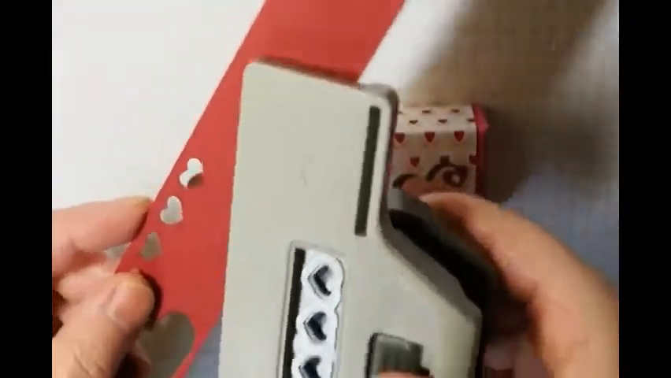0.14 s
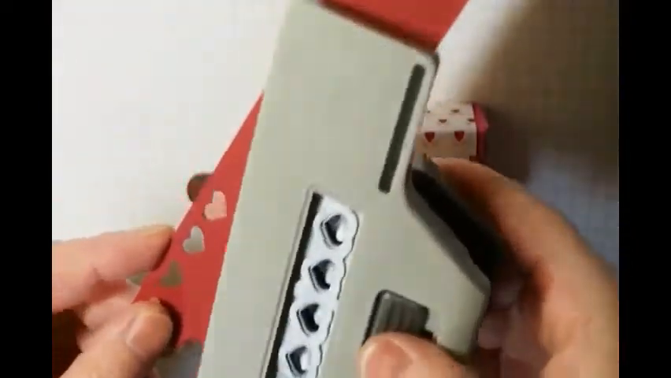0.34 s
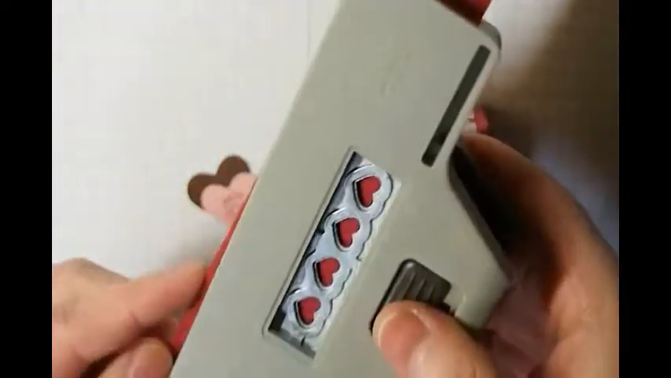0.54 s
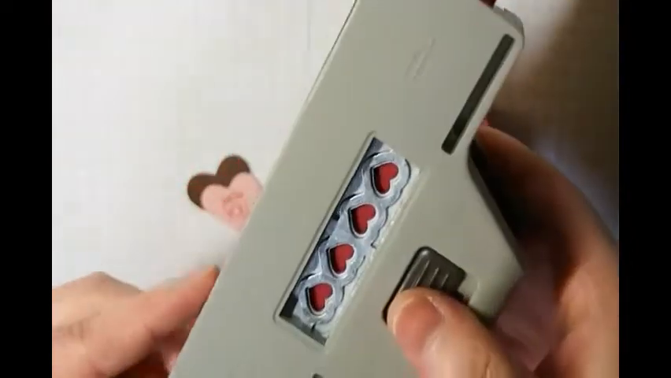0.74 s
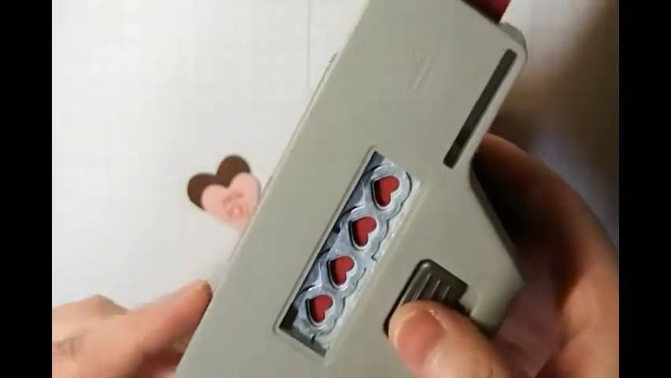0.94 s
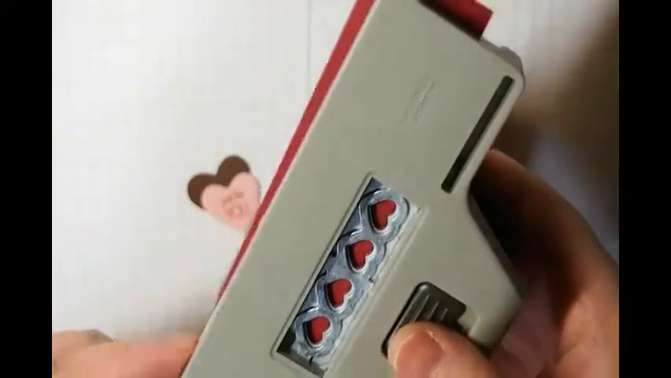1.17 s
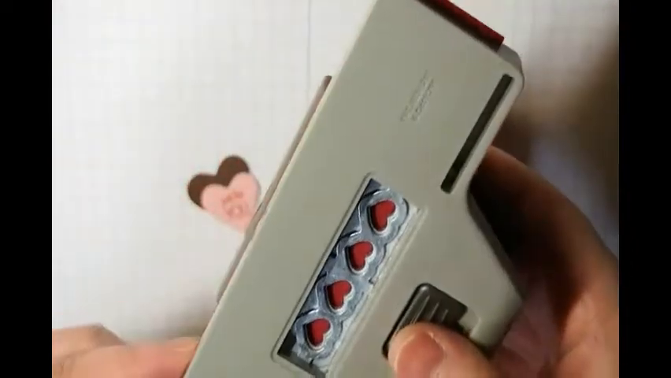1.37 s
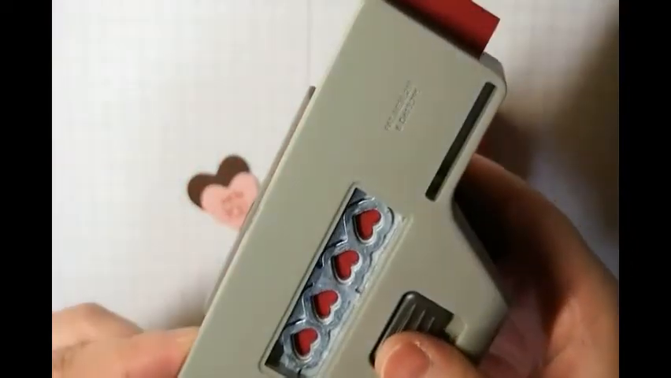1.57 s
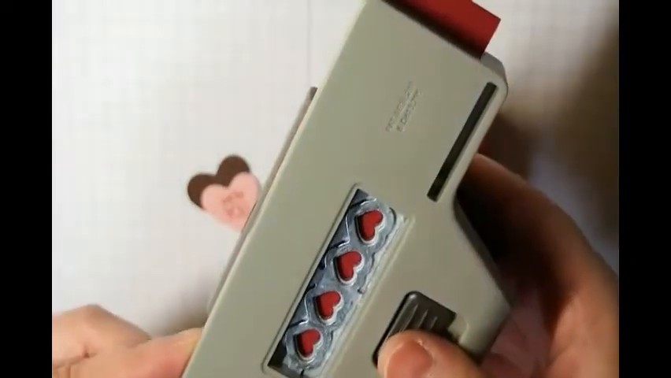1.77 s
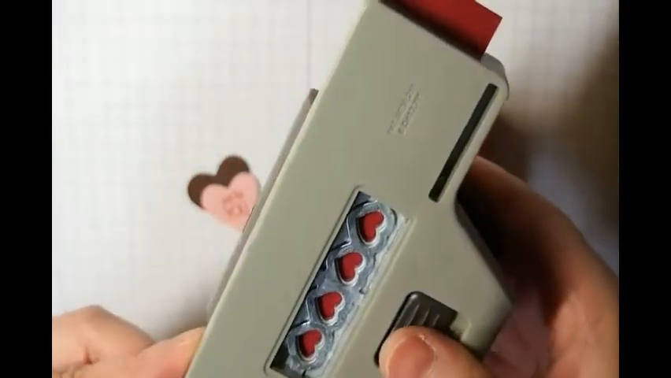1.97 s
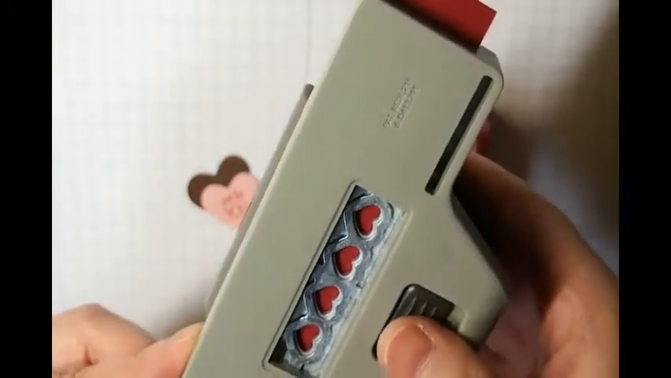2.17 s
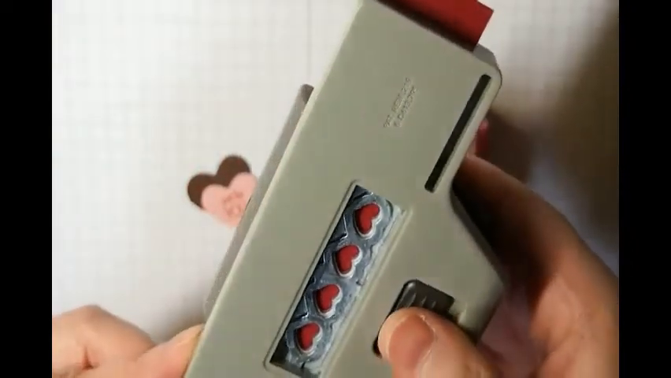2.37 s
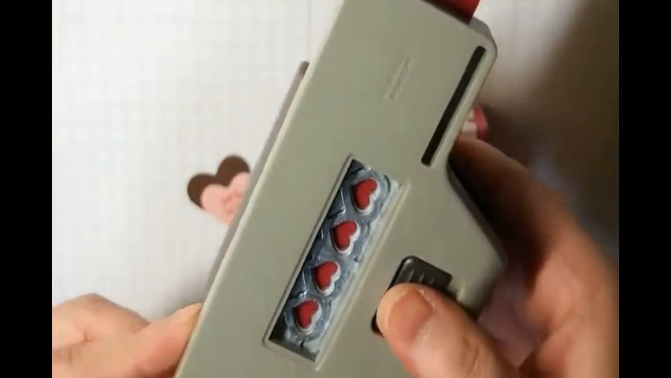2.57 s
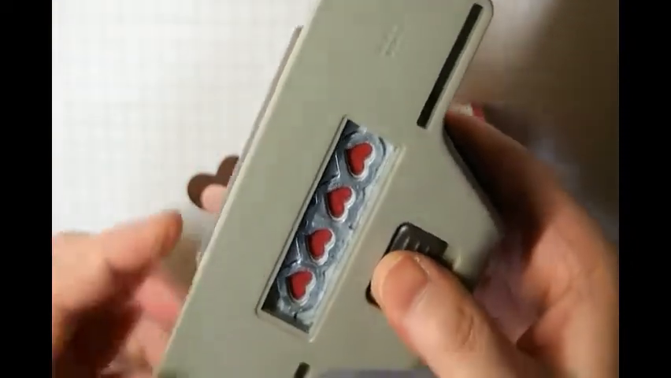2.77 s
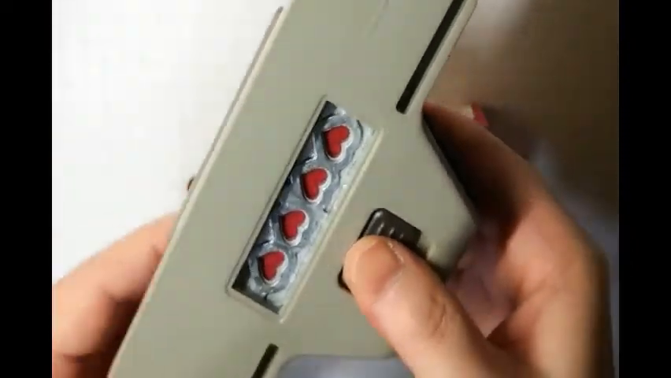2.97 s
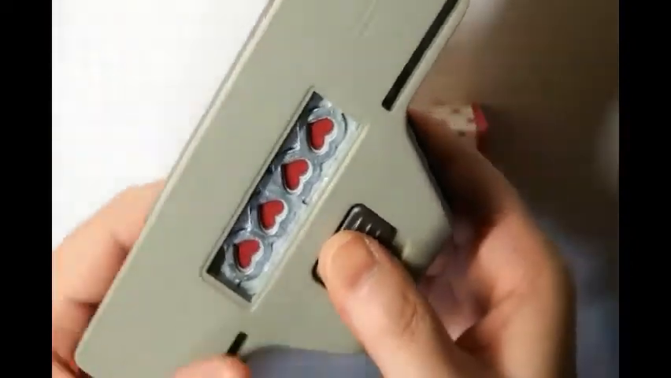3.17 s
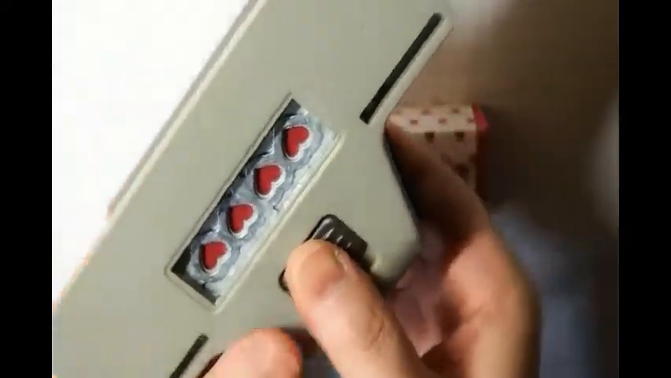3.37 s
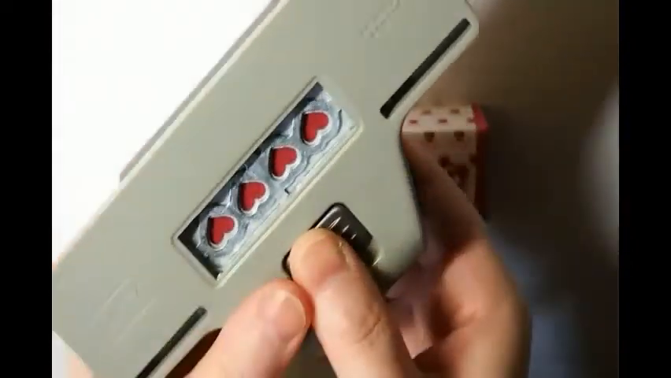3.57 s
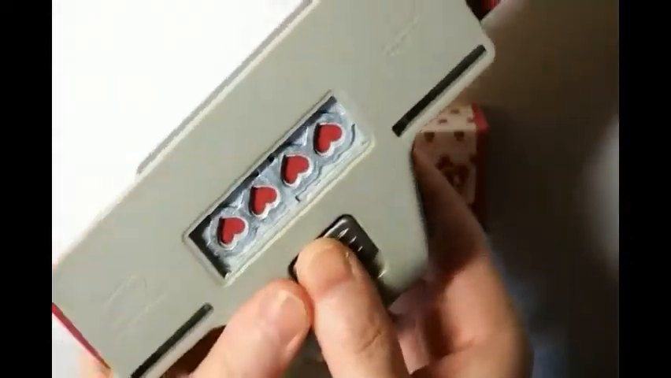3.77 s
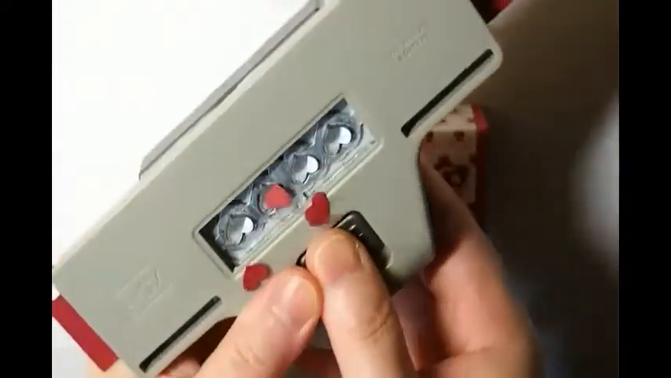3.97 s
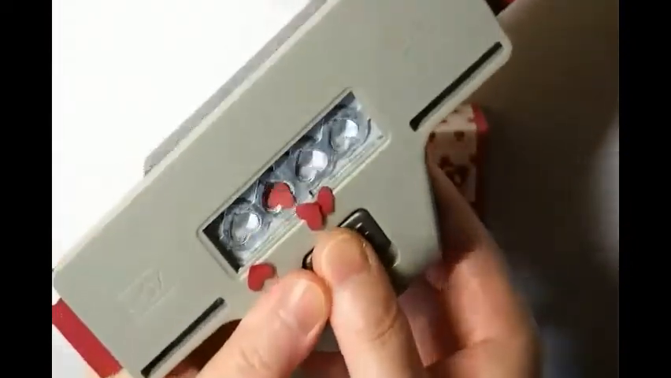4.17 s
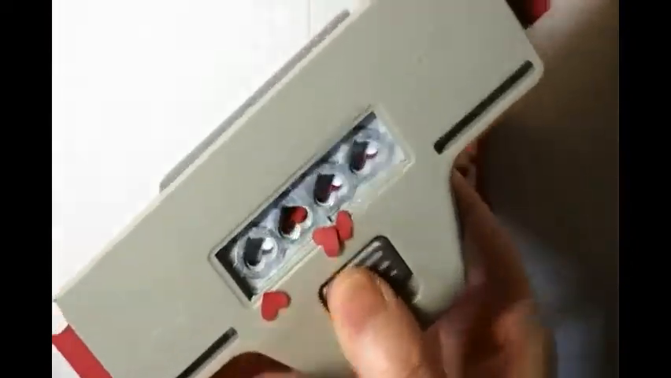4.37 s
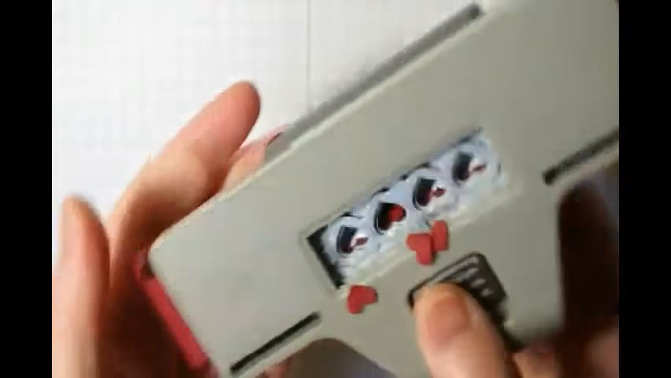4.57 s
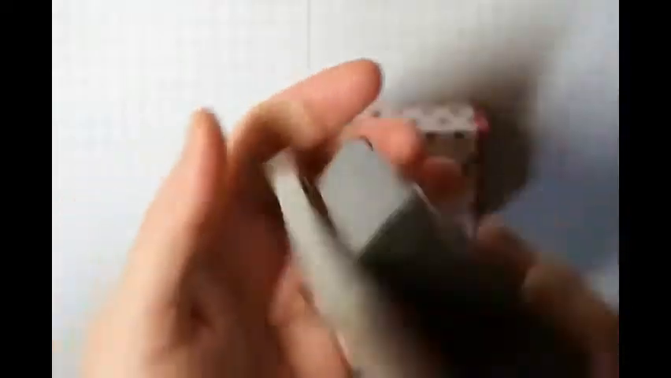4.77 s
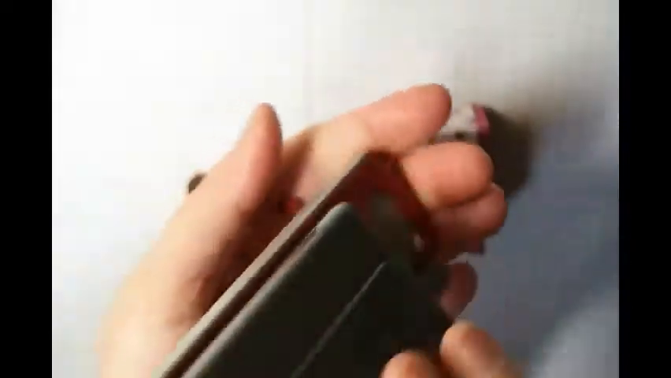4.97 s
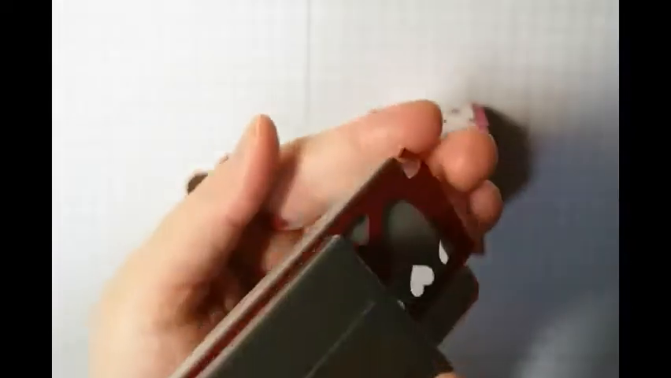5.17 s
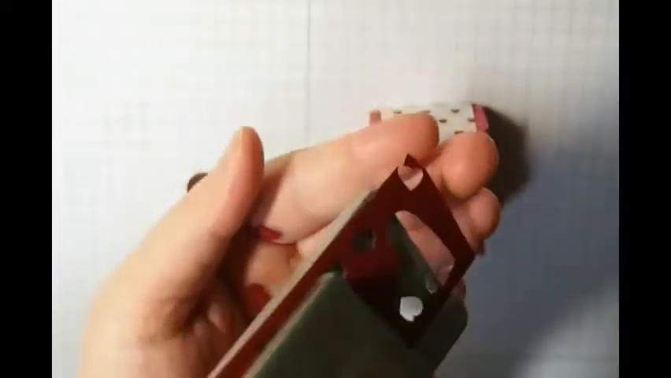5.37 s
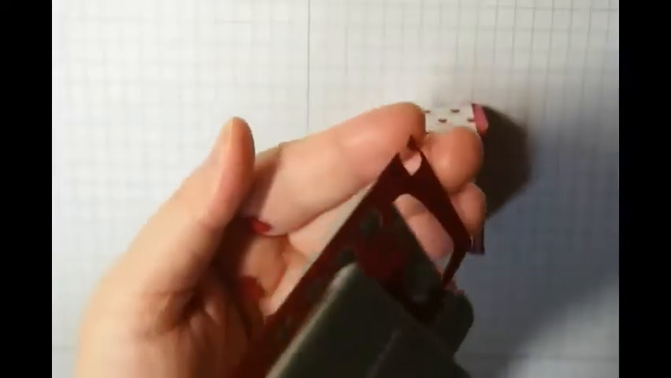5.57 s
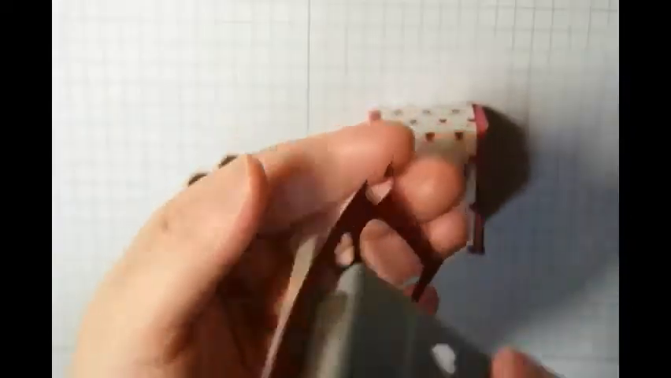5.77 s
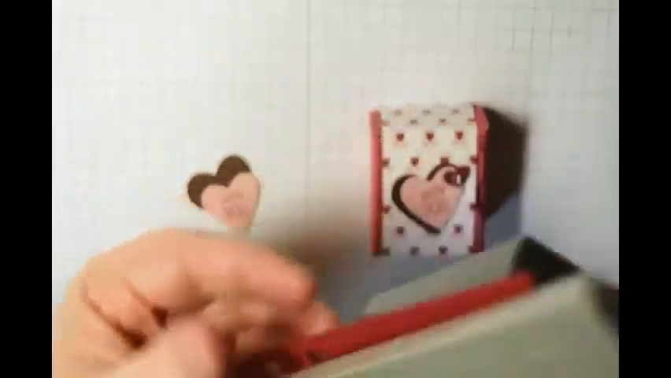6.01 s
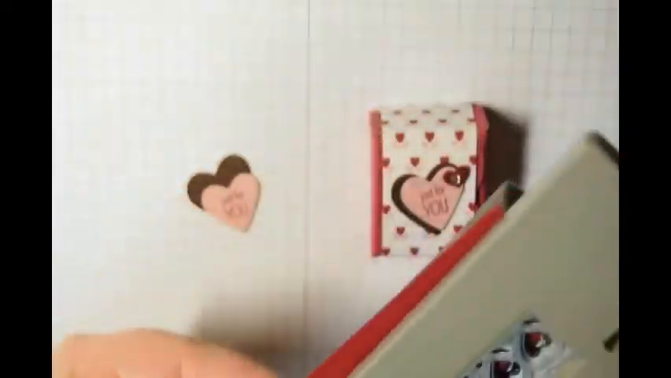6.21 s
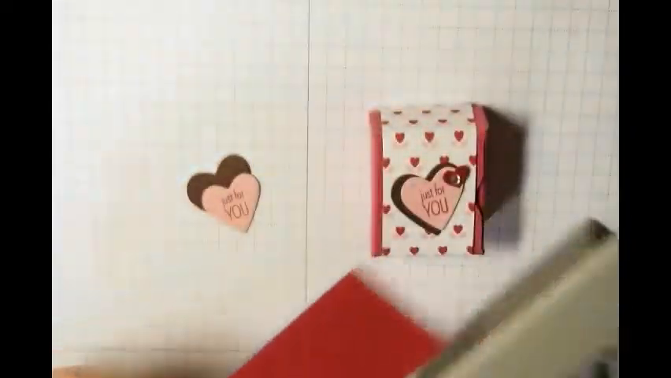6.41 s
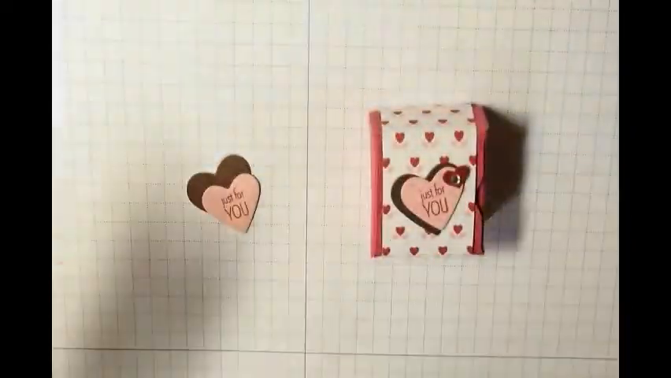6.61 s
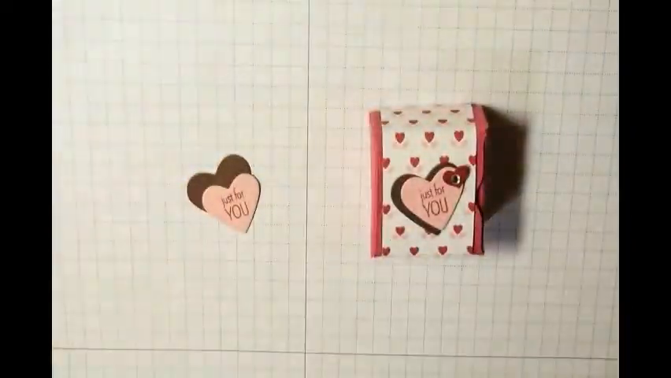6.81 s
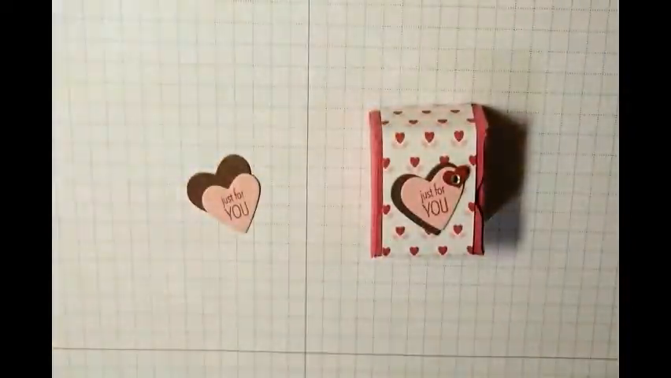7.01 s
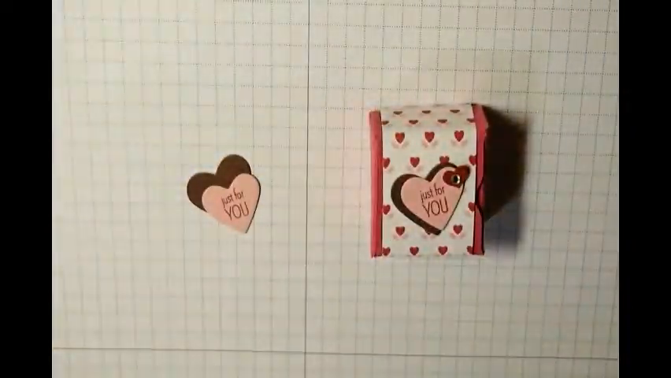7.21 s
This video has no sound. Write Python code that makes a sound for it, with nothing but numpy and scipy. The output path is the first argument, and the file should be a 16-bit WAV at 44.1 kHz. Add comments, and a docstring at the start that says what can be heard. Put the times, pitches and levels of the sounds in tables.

```python
"""A hand-held plastic punch bites twice into a strip of cardstock, the second time doubly, and snaps through.
Each contact is a swelling noise burst: a bright crack that excites the housing modes, plus a tuned knock.
Card, fingers and the returning lever tap the housing; slides, squeeze and release are stick-slip noise.
Beneath lie a faint, partly shared room hiss and a faint fluttering drone of ticks from a small motor.
Reflections of a small room surround all but hiss and thud; a limiter ducks the sound above its ceiling."""
import sys
import numpy as np
from scipy import signal
from scipy.fft import rfft, irfft, next_fast_len
from scipy.io import wavfile
from scipy.ndimage import uniform_filter1d

SR = 44100
rng = np.random.default_rng(int(sys.argv[2]) if len(sys.argv) > 2 else 0)


def log_audio(samples):
    """Write samples as a 16-bit WAV file to the path given in sys.argv[1]."""
    # one column per channel
    frames = np.atleast_2d(samples).T
    # limit to full scale, then quantise
    limited = np.clip(frames, -1, 1)
    pcm = np.round(limited * 32767).astype(np.int16)
    wavfile.write(sys.argv[1], SR, pcm)


N = 319725

# resonances of the hollow plastic body: pitch_hz, width_hz, relative level_db
HOUSING_MODES = [(756, 180, -10), (1140, 270, -29), (1662, 230, 2), (1557, 210, 1), (1750, 36, -15),
                 (2230, 680, -1), (2686, 165, -4), (3160, 153, 8.5), (4270, 59, 2.5), (5430, 91, -3),
                 (5900, 470, -1), (6250, 170, -7.5)]


def from_db(db):
    """Decibels express a logarithmic amplitude ratio; this returns the ratio."""
    return 10 ** (np.asarray(db) / 20)


def rms_one(x):
    """Root-mean-square normalisation: mean power becomes one."""
    return x / np.sqrt(np.mean(x ** 2) + 1e-20)


def at_hz(points, hz):
    """Linear interpolation of a table on a logarithmic frequency axis."""
    table_hz, value = np.transpose(points)
    return np.interp(np.log(np.maximum(hz, 1)), np.log(table_hz), value)


def coloured(x, spectrum):
    """Spectral shaping: each frequency is multiplied by its tabled gain, then the rms is set to one."""
    size = next_fast_len(x.shape[-1])
    gain = from_db(at_hz(spectrum, np.fft.rfftfreq(size, 1 / SR)))
    shaped = irfft(rfft(x, size) * gain, size)
    return rms_one(shaped[..., :x.shape[-1]])


def drift(rate_hz):
    """Slow random fluctuation: random values arrive at a given rate and are joined by straight lines."""
    turns = np.arange(N) / SR * rate_hz
    return np.interp(turns, np.arange(N), rng.standard_normal(N))


def resonance(x, hz, width_hz):
    """A damped oscillator as a two-pole filter, with gain near one at its peak."""
    r = np.exp(-np.pi * width_hz / SR)
    zeros = np.array([1, 0, -1]) * (1 - r * r) / 2
    poles = [1, -2 * r * np.cos(2 * np.pi * hz / SR), r * r]
    return signal.lfilter(zeros, poles, x + 1e-18)


def panned(x, left_db):
    """Interaural level difference: left exceeds right by left_db."""
    return x * from_db(np.array([[left_db], [-left_db]]) / 2)


def air():
    """Broadband ambient noise with steady resonances, partly correlated between the sides."""
    # spectrum of the background: pitch_hz, relative level_db
    air_colour = [(25, 4.5), (45, -8.5), (90, -1.5), (180, 1.5), (280, -2), (400, -6.5), (520, -1.5),
                  (680, 1), (1000, -5), (1600, -0.5), (2300, -6), (4500, -7), (14000, -10.5), (16000, -16)]
    # steady rings in the hiss: pitch_hz, width_hz, level_db (rms before panning)
    hiss_rings = [(3033, 220, -66), (6330, 390, -72.5), (1700, 67, -82)]
    white = 0.61 * rng.standard_normal(N) + rng.standard_normal((2, N))
    rings = sum(from_db(db) * rms_one(resonance(white, hz, width)) for hz, width, db in hiss_rings)
    return from_db(-54) * coloured(white, air_colour) + rings


def drone(level_db, weak_db, low_hz, top_hz, uneven_db, ring_hz, ring_width_hz):
    """A band-limited pulse train from a small motor, strong and weak in turn; dispersion chirps each tick upward."""
    # stretches of drone and lone ticks where it stalls and restarts: start_s, end_s, relative level_db
    drone_runs = [(.0575, 2.64, 0), (2.688, 2.70, 0), (3.2695, 3.28, 3.5), (3.3267, 3.34, -3),
                  (3.3607, 7.25, 0)]
    ticks_per_s = 29.97
    ticks = np.zeros(N)
    for start_s, end_s, db in drone_runs:
        at = (np.arange(start_s, end_s, 1 / ticks_per_s) * SR).astype(int)
        alternate_db = weak_db * (np.arange(len(at)) % 2)
        ticks[at] = from_db(db + alternate_db + uneven_db * rng.standard_normal(len(at)))
    ticks = signal.sosfilt(signal.cheby1(10, .5, top_hz, fs=SR, output="sos"), ticks + 1e-18)
    ticks = signal.sosfilt(signal.butter(2, low_hz, "high", fs=SR, output="sos"), ticks)
    ticks = ticks - 2 * resonance(ticks, ring_hz, ring_width_hz)  # all-pass: delay without colour
    return from_db(level_db) * rms_one(np.diff(ticks, prepend=0))


def housing(x):
    """Modal superposition: the hollow body answers as a sum of resonances of alternating sign."""
    ringing = 0
    for k, (hz, width_hz, db) in enumerate(HOUSING_MODES):
        ringing = ringing + (-1) ** k * from_db(db) * resonance(x, hz, width_hz)
    return ringing


def burst(swell_s, size=9000, lead_count=200):
    """Impact as a cluster of micro-slips: noise swells and decays, with an impulse that dominates brief hits."""
    clean_snap_s = 0.00075  # here the impulse is as large as the norm of the noise
    age = np.maximum(np.arange(size) - lead_count, 0) / SR / swell_s
    slips = rng.standard_normal(size) * age * np.exp(-age)
    slips /= np.linalg.norm(slips)
    slips[np.argmax(age >= 1)] += (clean_snap_s / swell_s) ** 2
    return slips


def add(track, s, sound, db, lead_count=200):
    """Superposition at equal energy: the level is the sound's whole energy taken as rms over 5 ms."""
    start = int(s * SR) - lead_count  # the sound begins with a silent lead-in
    sound = sound * signal.windows.tukey(len(sound), .03)
    sound = sound * from_db(db) * np.sqrt(.005 * SR / np.sum(sound ** 2))
    track[start:start + len(sound)] += sound[:N - start]


def contacts(table, knock_q, ring_db):
    """Impact excitation: a bright crack sets the modes ringing, beside a knock at the struck spot's pitch."""
    # spectrum of a crack: pitch_hz, relative level_db
    crack_colour = [(100, -23), (400, -4.5), (800, -35), (1500, 8), (3500, 0.5), (6500, 5), (9000, 6),
                    (13000, 6), (16000, -9)]
    out = np.zeros(N)
    for s, swell_s, crack_db, knock_db, knock_hz in table:
        crack = coloured(burst(swell_s), crack_colour)
        narrow_knock = resonance(burst(swell_s), knock_hz, knock_hz / knock_q)
        knock = resonance(narrow_knock, knock_hz, knock_hz)
        add(out, s, crack + from_db(ring_db) * housing(crack), crack_db)
        add(out, s, knock, knock_db)
    return out


def taps():
    """Brief impacts: card and fingers tap the housing and the lever rattles springing back, all of one rise time."""
    # levels before room and panning: start_s, crack level_db, knock level_db, pitch_hz of the spot hit
    tap_rows = [(.0835, -55, -57, 5140), (.2572, -47.5, -41, 980), (0.259, -52, -43, 2900),
                (0.331, -44.5, -45.5, 876), (0.3919, -41, -46, 1080), (0.7842, -46, -33, 1780),
                (1.2080, -48.5, -58, 3150), (1.291, -54, -53, 1680), (3.396, -56, -49, 1570),
                (3.5824, -34.5, -48, 1670), (4.3580, -56, -41, 6050), (4.3669, -49, -35.5, 1430),
                (4.4130, -51, -45, 6200), (4.4230, -50, -38, 5860), (4.4457, -44, -41, 3900),
                (4.4670, -50, -47.5, 1610), (4.4730, -55, -45, 6200), (4.8530, -44, -50, 3300),
                (5.467, -53, -44.5, 2900), (5.943, -48, -60, 3180), (5.987, -34.5, -39, 12600),
                (5.9998, -34, -35.5, 2800), (6.0228, -38, -40, 4650), (6.0330, -43, -42, 3220),
                (6.0570, -45, -35, 1650), (6.4051, -38, -35, 6200), (6.4059, -52, -34.5, 4000),
                (6.5510, -44, -47, 875), (6.939, -62, -50.5, 3480)]
    swell_s = .0007
    return [(s, swell_s, crack_db, knock_db, hz) for s, crack_db, knock_db, hz in tap_rows]


def strokes():
    """Friction envelopes: each stroke sets in, changes steadily in decibels and decays when the motion stops.

    Returns hiss gain, rub gain and the power-weighted leading pitch in octaves."""
    # slides of card and hands, the card straining under the squeeze, and the lever's release:
    # start_s, end_s, growth_db over the stroke, final card hiss level_db and
    # final housing rub level_db (before mixing), pitch_hz that leads
    stroke_rows = [(0.333, 0.656, 5, -45, -49, 1910), (0.396, 0.574, -5.5, -62, -51, 5270),
                   (0.674, 0.727, -5, -54, -51.5, 3080), (0.768, .795, 6, -48, -42, 1760),
                   (0.884, 0.972, -6.5, -58, -56.5, 1700), (1.125, 1.156, 0.5, -59, -60.5, 1800),
                   (1.418, 1.426, 10, -50, -45, 3300), (1.63, 1.728, 5.5, -53, -51.5, 1700),
                   (2.819, 2.834, 10, -45.5, -47.5, 1600), (3.32, 3.477, 1, -53.5, -61, 1670),
                   (3.494, 3.558, 9, -50, -44, 3160), (3.581, 3.644, -11.5, -60, -55, 1880),
                   (3.875, 3.909, 6, -77, -51.5, 1540), (3.961, 4.042, 0, -62, -39, 1720),
                   (4.316, 4.452, 6, -51, -52.5, 7500), (4.363, 4.481, -4, -62, -47, 1440),
                   (4.927, 4.987, 14.5, -37, -44, 2900), (5.04, 5.077, 13, -40.5, -46, 3100),
                   (5.117, 5.154, 8.5, -36.5, -42.5, 3180), (5.164, 5.258, 0, -50.5, -53.5, 2370),
                   (5.333, 5.493, 4, -60, -49, 3000), (5.636, 5.662, 3.5, -49.5, -47.5, 2770),
                   (5.703, 5.818, 16, -54.5, -49, 2880), (5.99, 6.061, 2, -43.5, -37.5, 3030),
                   (6.09, 6.137, 12, -36.5, -38, 2400), (6.176, 6.222, 9, -64, -46.5, 3250),
                   (6.3, 6.403, 5, -46.5, -39, 3400), (6.457, 6.575, 2.5, -39.5, -44, 2920),
                   (6.622, 6.68, 3, -52.5, -79, 2560)]
    attack_s, release_s = 0.018, 0.017  # the attack ends at start_s; the release is a time constant
    t, hiss_power, rub_power, focus = np.arange(N) / SR, 0, 1e-20, 0
    for start_s, end_s, growth_db, hiss_db, rub_db, hz in stroke_rows:
        to_go = np.clip((end_s - t) / (end_s - start_s), 0, 1)
        attack = np.clip((t - start_s) / attack_s + 1, 0, 1)
        release = np.exp(-np.clip((t - end_s) / release_s, 0, 20))
        effort = attack * release * from_db(-growth_db * to_go)
        rubbing = (effort * from_db(rub_db)) ** 2
        hiss_power = hiss_power + (effort * from_db(hiss_db)) ** 2
        rub_power = rub_power + rubbing
        focus = focus + rubbing * np.log2(hz)
    return np.sqrt(hiss_power), np.sqrt(rub_power), focus / rub_power


def snags():
    """Sparse random impulses: single fibres snag and spring free above the even friction."""
    snags_per_s, level_db, spread_db = 200, 11.5, 3.5  # level against the even friction
    sizes = from_db(level_db + spread_db * np.clip(rng.standard_normal(N), -2, 2))
    return sizes * (rng.random(N) < snags_per_s / SR)


def sliding(grain_db, judder_db, focus_db_per_octave, side_db, wander_db):
    """Stick-slip friction: fibres catch and let go; one grip shapes both card hiss and housing resonance."""
    # spectrum of the card hiss: pitch_hz, relative level_db
    card_colour = [(200, -23), (450, -16), (750, -6), (1300, -13), (2500, -3), (5000, 0), (8000, -1.5),
                   (12000, -2.5), (16000, -6.5)]
    hiss_gain, rub_gain, focus = strokes()
    grip = from_db(grain_db * drift(1500) + judder_db * drift(90))
    common = rng.standard_normal((2, 1, N))
    opposed = rng.standard_normal((2, 1, N)) * [[1], [-1]]  # opposite sign left and right
    slips = grip * (common + from_db(side_db) * opposed) + snags()
    hiss, friction = coloured(slips[0], card_colour), rms_one(slips[1])
    rub, power = 0, 0
    for hz, width_hz, db in HOUSING_MODES:
        off_focus = np.abs(np.log2(hz) - focus)  # octaves; distant modes are driven less
        share = from_db(db - focus_db_per_octave * off_focus + wander_db * drift(25))
        rub = rub + share * resonance(friction, hz, width_hz)
        power = power + share ** 2 * np.pi * width_hz / SR
    return hiss_gain * hiss + rub_gain * rub / np.sqrt(power)


def bites(count=3):
    """Progressive fracture: each bite of the blades is followed by ever weaker crunches as fibres give way."""
    # levels before room and panning: start_s, crack level_db, knock level_db
    bite_rows = [(3.9443, -30.5, -18.5), (3.9863, -29, -25), (3.9912, -25, -20.5)]
    bite_swell_s, bite_hz = 0.0013, 1515
    crunch_gap_s, crunch_swell_s, crunch_hz = .0112, 0.0014, 1700
    first_drop_db, next_drop_db = -16, -8  # first against its bite; each against the one before
    rows = []
    for s, crack_db, knock_db in bite_rows:
        rows.append((s, bite_swell_s, crack_db, knock_db, bite_hz))
        for k in range(count):
            drop_db = first_drop_db + next_drop_db * k
            crunch_s = s + crunch_gap_s * (k + 1)
            rows.append((crunch_s, crunch_swell_s, crack_db + drop_db, knock_db + drop_db, crunch_hz))
    return rows


def thud(level_db, top_hz):
    """Low-passed impulse response: the lever bottoming out in the hand gives one short dull push."""
    lever_stop_s = 4.0368
    out, push = np.zeros(N), signal.unit_impulse(4000, 200)
    dull_push = signal.sosfilt(signal.butter(2, top_hz, fs=SR, output="sos"), push)
    add(out, lever_stop_s, dull_push, level_db)
    return out


def room(x, desk_db, desk_t60_s, tail_db, size=24000):
    """Reverberation by convolution: desk and hand reflections, plus a tail lasting longest in the middle range."""
    # time for the tail to fall 60 dB: pitch_hz, decay_s
    tail_decay = [(300, 0.043), (1500, 0.39), (5000, 0.36), (15000, 0.19)]
    t = np.arange(size) / SR
    edges = np.geomspace(100, 18000, 8)
    tail = 0
    for band in zip(edges, edges[1:]):
        band_filter = signal.butter(2, band, "band", fs=SR, output="sos")
        decay = from_db(-60 * t / at_hz(tail_decay, np.sqrt(np.prod(band))))
        tail = tail + signal.sosfilt(band_filter, rng.standard_normal((2, size))) * decay
    mid, side = rng.standard_normal((2, size))
    # long waves reach both sides alike
    side = signal.sosfilt(signal.butter(1, 2500, "high", fs=SR, output="sos"), side)
    desk = (mid + side * [[1], [-1]]) * from_db(-60 * t / desk_t60_s)
    late = from_db(tail_db) * rms_one(tail * (t > .004))
    echoes = (late + from_db(desk_db) * rms_one(desk)) / np.sqrt(size)
    return x + signal.fftconvolve(np.atleast_2d(x), echoes, axes=1)[:, :N]


def from_right(x, left_db):
    """Interaural level and time differences: a source on the right is softer and later on the left."""
    left_lag_s = 1.3e-5
    lag = np.exp(-2j * np.pi * np.fft.rfftfreq(N, 1 / SR) * left_lag_s)
    return panned(np.array([irfft(rfft(x[0]) * lag, N), x[1]]), left_db)


def scene():
    """Linear superposition: the punch, a little to the right, over the drone on the left and the hiss."""
    # the card shears, the lever lands, the blades snap home and the loose parts chatter; before room and
    # panning: start_s, swell_s, crack level_db, knock level_db, knock pitch_hz
    breakthrough = [(4.0304, .0011, -19, -36, 1670), (4.0331, .0011, -9.5, -13, 1223),
                    (4.0369, .0004, -5.5, -14, 1520), (4.0370, 0.00075, -32, -15, 880),
                    (4.0385, .00015, -2.5, -9.5, 6300), (4.0390, 0.028, -19.5, -21.5, 2670)]
    flutter = drone(level_db=-57.0, weak_db=-7.0, low_hz=620, top_hz=1150, uneven_db=1.27,
                    ring_hz=1020, ring_width_hz=246)
    flutter = room(flutter, desk_db=-19.0, desk_t60_s=0.34, tail_db=-10.0)
    tapping = contacts(taps(), knock_q=12.3, ring_db=5.0)
    tapping = room(tapping, desk_db=0.5, desk_t60_s=0.072, tail_db=-7.0)
    rustle = sliding(grain_db=3.0, judder_db=2.85, focus_db_per_octave=10.5, side_db=-9.5, wander_db=5.0)
    rustle = room(rustle, desk_db=-5.5, desk_t60_s=0.055, tail_db=-13.0)
    cutting = contacts(bites(), knock_q=11.0, ring_db=4.5)
    cutting = cutting + contacts(breakthrough, knock_q=7.1, ring_db=2.5)
    punch = room(cutting, desk_db=-1.0, desk_t60_s=0.028, tail_db=-13.0)
    close = from_right(punch + tapping + from_db(-1.0) * rustle, left_db=-2.7)
    push = panned(thud(level_db=-21.5, top_hz=130), left_db=-11.0)
    return close + push + panned(flutter, left_db=9.0) + panned(air(), left_db=-1.7)


def limiter(x, ceiling_db, release_db_per_s):
    """Dynamic range limiting: gain falls quickly when the level passes the ceiling, then creeps back."""
    power = uniform_filter1d(np.mean(x ** 2, axis=0), size=220)  # averaged over 5 ms
    level_db = 10 * np.log10(np.maximum(power, 1e-12))
    fall_db = release_db_per_s * np.arange(N) / SR
    # a running maximum in a frame that sinks steadily: instant attack, linear release
    over_db = np.maximum.accumulate(np.maximum(level_db - ceiling_db, 0) + fall_db) - fall_db
    return x * from_db(-uniform_filter1d(over_db, size=64))


def record(dry):
    """Nonlinear and band-limited transmission: limiter, rounded peaks and a steep top cut."""
    cutoff_hz = 15900
    out = limiter(dry, ceiling_db=-9.5, release_db_per_s=45.5)
    out = .78 * np.tanh(out / .78)
    return signal.sosfilt(signal.ellip(10, .2, 80, cutoff_hz, fs=SR, output="sos"), out)


dry = scene()
out = record(dry)
log_audio(out)
```